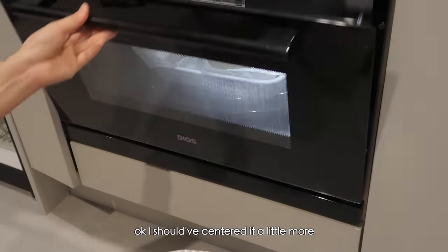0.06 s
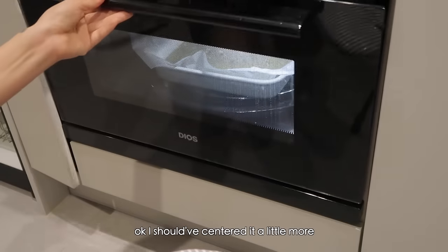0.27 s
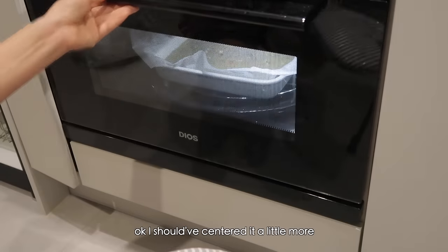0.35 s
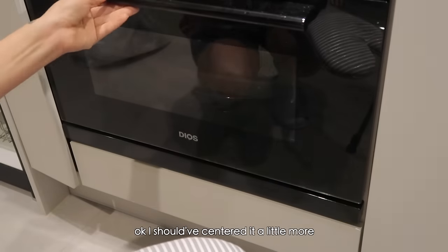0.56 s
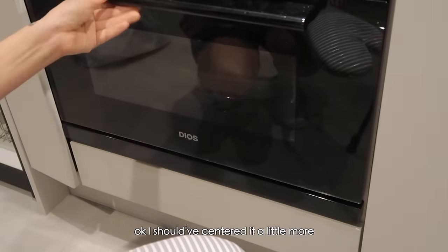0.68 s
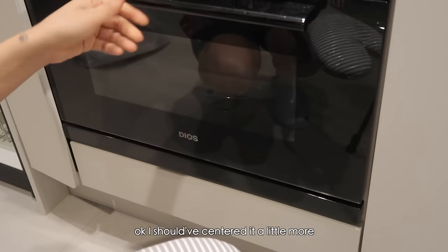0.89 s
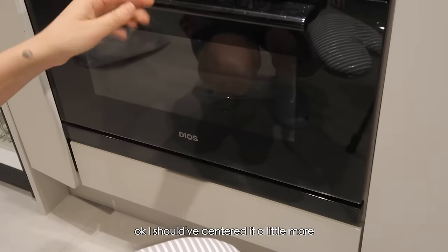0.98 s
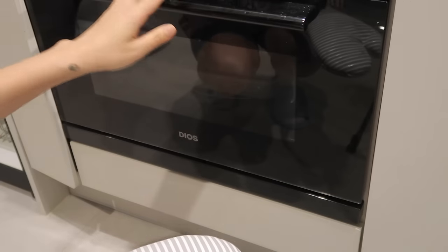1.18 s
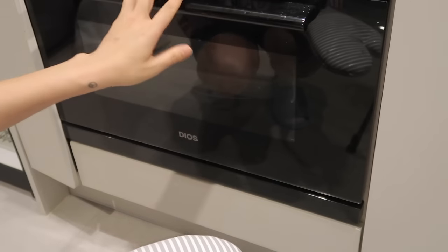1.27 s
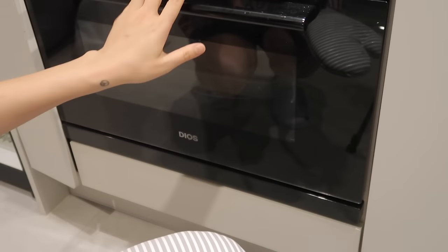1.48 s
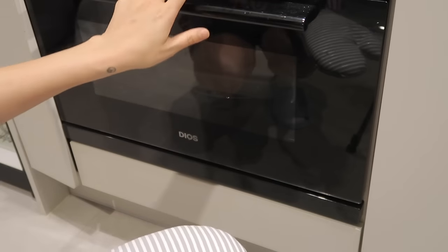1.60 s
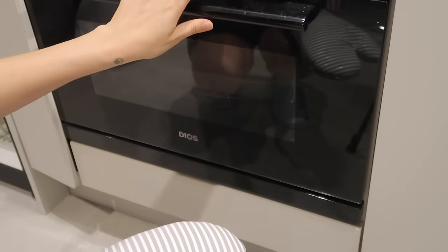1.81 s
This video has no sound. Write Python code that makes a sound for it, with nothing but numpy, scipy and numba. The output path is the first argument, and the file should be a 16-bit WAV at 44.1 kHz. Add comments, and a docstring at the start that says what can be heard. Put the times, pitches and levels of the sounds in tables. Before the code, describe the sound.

An oven door is pushed shut: a light hinge rattle, then one sharp, booming slam with a brief clatter of glass and metal. The oven fan hums throughout, duller afterwards. Heard close up in a kitchen.

```python
"""Kitchen, close to a phone: an oven door is pushed shut while the oven fan hums.
The hinge catches with a light rattling bump, then the door slams on its frame: a crack, a low boom of
the case, a short clatter of glass and sheet metal. The closing gap shuts off the fan's brighter air.
The slam overloads the recorder, whose gain ducks and creeps back."""
import sys
import numpy as np
from scipy import signal
from scipy.fft import rfft, irfft
from scipy.io import wavfile
from scipy.ndimage import uniform_filter1d
from numba import njit

SR = 44100
rng = np.random.default_rng(int(sys.argv[2]) if len(sys.argv) > 2 else 0)


def int16_out(signal):
    """Quantize to a 16-bit WAV file."""
    q = np.round(np.clip(np.atleast_2d(signal).T, -1, 1) * 32767)
    wavfile.write(sys.argv[1], SR, q.astype(np.int16))


N = 81585
SLAM_S = 0.3852


# door seating on its frame (time after first contact [s], level [dB])
SEATING_CONTACTS = [(0, -0.5), (.0031, 5.5), (.0053, 3.5), (.0090, -3.5), (.019, -2.5)]
# metal-on-metal snap (frequency [Hz], relative density [dB])
SNAP_SPECTRUM = [(60, -23.5), (300, 7.5), (1000, -0.5), (3000, -1.5), (4500, -8), (8000, -25.5),
                 (16000, -38.5)]
# slam clatter (frequency [Hz], relative density [dB])
CLATTER_SPECTRUM = [(40, -38), (90, -15.5), (150, -5.5), (310, 0.5), (460, -8.5), (750, -5.5), (1000, -12),
                    (2400, -3.5), (3300, -5), (4500, -11), (8000, -23.5), (11000, -35), (16000, -48)]
# panel decay (frequency [Hz], T60 [s])
PANEL_DECAY = [(100, 0.16), (500, 0.36), (2000, 0.17), (5000, 0.12), (9000, 0.22), (15000, 0.066)]

def slam(crack_hz=2620, crack_db=5.5, snap_t60_s=.016, clatter_db=0.5, boom_db=13, ring_db=-3.5):
    """Door hits frame: a crack, quick snapping contacts, case boom, clattering and ringing panels."""
    crack = undb(crack_db) * np.sin(2 * np.pi * crack_hz * clock()) * decay(t60_s=.01)
    contacts = sum(delay(undb(db) * white() * decay(snap_t60_s), s) for s, db in SEATING_CONTACTS)
    panel_noise = band_decay(white(), PANEL_DECAY) * rise(tau_s=.0018)
    clatter = undb(clatter_db) * stereo(panel_noise, CLATTER_SPECTRUM)
    snap = stereo(contacts, SNAP_SPECTRUM)
    impact = crack + snap + clatter + undb(boom_db) * case_boom() + undb(ring_db) * panel_ring()
    return delay(impact, SLAM_S)


# oven case and cabinet modes (frequency [Hz], level [dB], T60 [s])
CASE_MODES = [(66.23, -15, .36), (84.5, -19, .45), (115.7, -16.5, 0.08), (128.4, -1.5, 0.11),
              (158.6, -4, 0.062), (197.3, -21, 0.35), (232.8, -17.5, 0.15), (295, 3, 0.069),
              (354.4, -9, 0.13)]

def case_boom(push_s=.00055, lag_s=.00062):
    """The case is pushed inwards through the soft seal and swings in its low modes."""
    pole = np.exp(-1 / (push_s * SR))
    cushioned = signal.lfilter([(1 - pole) ** 2], [1, -2 * pole, pole ** 2], ring(CASE_MODES, np.cos))
    return -delay(cushioned, lag_s)


# door glass and sheet metal modes (frequency [Hz], level [dB], T60 [s])
DOOR_MODES = [(532.5, -10.5, 0.45), (565.6, -10.5, 0.25), (682, -3, 0.091), (785.4, 5, 0.091),
              (1137, -4.5, 0.11), (1608, -3, .14), (1945, 0.5, 0.087), (2024, -6.5, 0.26),
              (2530, -5.5, 0.11), (2903, -9, 0.12), (3267, -6.5, 0.077), (4000, -11, 0.12)]

def panel_ring(spread_s=.004):
    """The blow spreads over the door and wakes each mode after a random lag."""
    lags_s = rng.random(len(DOOR_MODES)) * spread_s
    return sum(delay(ring([mode]) * rise(tau_s=.0004), s) for mode, s in zip(DOOR_MODES, lags_s))


# hinge, seal and door knocks (time [s], rattle level [dB], boom level [dB])
LIGHT_KNOCKS = [(0.2171, -29, -50), (0.2228, -19, -31.5), (0.2299, -33.5, -32.5), (0.2379, -31, -22.5),
                (0.2476, -36, -23), (0.2700, -42, -20), (0.338, -30.5, -28), (0.368, -23.5, -32.5),
                (0.3827, -19, -32), (0.4150, -7.5, -15.5), (0.46, -17.5, -5)]
# knock rattle (frequency [Hz], relative density [dB])
RATTLE_SPECTRUM = [(60, -23.5), (200, -7.5), (330, 4.5), (550, 2.5), (1000, -1.5), (1800, 2), (3300, -4.5),
                   (5000, -12.5), (8000, -34.5), (11000, -42), (16000, -42.5)]

def knocks(ring_db=-14):
    """Light contacts rattle the panels and nudge the case."""
    boom = case_boom()
    ringing = undb(ring_db) * panel_ring()
    rattle = stereo(band_decay(white(), PANEL_DECAY), RATTLE_SPECTRUM) + ringing
    return sum(delay(undb(rattle_db) * rattle + undb(boom_db) * boom, s)
               for s, rattle_db, boom_db in LIGHT_KNOCKS)


# kitchen reverberation (frequency [Hz], T60 [s])
ROOM_DECAY = [(80, 0.82), (250, 0.63), (600, 0.7), (1200, 0.53), (3000, 0.37), (8000, 0.39), (15000, 0.099)]
# reflection colour (frequency [Hz], relative gain [dB])
ROOM_SPECTRUM = [(40, -13), (80, -5), (135, -6), (250, -1), (400, -0.5), (700, -1.5), (3000, 2),
                 (16000, -4)]

def kitchen_reverb(x, level_db=-14, predelay_s=.008):
    """Diffuse reflections from cupboards and floor."""
    tail = stereo(band_decay(white(), ROOM_DECAY) * rise(tau_s=.0097), ROOM_SPECTRUM)
    tail = delay(tail / np.sqrt(np.sum(tail ** 2) / 2), predelay_s)
    return undb(level_db) * signal.fftconvolve(x.mean(axis=0)[None], tail, axes=1)[:, :N]


# fan and motor lines, door shut (frequency [Hz], rms level [dB])
HUM_LINES = [(120.7, -37.5), (65.3, -49), (247, -56.5)]
# fan air (frequency [Hz], relative density [dB])
AIR_SPECTRUM = [(25, -12), (50, -4.5), (75, -4.5), (100, -3.5), (160, -6), (260, -7), (400, -8.5),
                (550, -7.5), (780, -13.5), (1050, -16.5), (1350, -13), (1750, -18.5), (2100, -18.5),
                (2600, -25), (3400, -30), (5000, -39.5), (8000, -47), (13000, -50), (16000, -69)]
# fan air stereo width (frequency [Hz], side minus mid [dB])
AIR_WIDTH = [(110, -60), (180, -25.5), (300, -12.5), (600, -17.5), (2100, -19.5), (2900, -10.5), (3900, 0),
             (5000, -1), (11000, 1.5)]
# air escaping through the open door (frequency [Hz], relative density [dB])
GAP_SPECTRUM = [(100, -12), (400, 7.5), (1100, 7.5), (2600, 4.5), (4000, -11.5), (8000, -27.5),
                (16000, -42)]

def fan(air_db=-39.5, gap_db=-39.5, closing_s=.12, open_boost_db=4, waver_db=.55, drift_rad=.08):
    """Motor hum and air noise; as the gap closes, the hum drops and the brighter air is shut off."""
    t = clock()
    hum = np.zeros(N)
    for hz, db in HUM_LINES:
        amplitude = np.sqrt(2) * undb(db + waver_db * wander(rate_hz=12))
        hum += amplitude * np.sin(2 * np.pi * hz * t + drift_rad * wander(rate_hz=2.2))
    opening = np.clip((SLAM_S - t) / closing_s, 0, 1)
    air = undb(air_db) * stereo(white(), AIR_SPECTRUM, AIR_WIDTH)
    gap_air = undb(gap_db) * opening * stereo(white(), GAP_SPECTRUM)
    return hum * undb(open_boost_db * opening) + air + gap_air


# stereo width of door, gap air and room (frequency [Hz], side minus mid [dB])
DEFAULT_WIDTH = [(100, -63.5), (200, -52), (350, -33), (750, -25.5), (1400, -27.5), (2400, -27.5),
                 (3400, -11), (4800, -7.5), (7000, 1.5), (11000, 6.5)]

def stereo(pair, spectrum, width=DEFAULT_WIDTH):
    """Two noises as mid and side, coloured at unit mid power gain; only the treble is wide."""
    mid, side = colour(pair, spectrum)
    rms_gain = np.sqrt(np.mean(undb(lookup(spectrum, np.linspace(0, SR / 2, N))) ** 2))
    return (mid + colour(side, width) * np.array([[1], [-1]])) / rms_gain


def colour(x, table):
    """Minimum-phase filter from (frequency [Hz], gain [dB])."""
    size = 2 * N
    cepstrum = irfft(np.log(undb(lookup(table, np.arange(N + 1) * SR / size))), size)
    cepstrum[1:N] *= 2
    cepstrum[N + 1:] = 0
    return irfft(rfft(x, size) * np.exp(rfft(cepstrum)), size)[..., :N]


def band_decay(x, t60_table):
    """Each half-octave band dies away at its own rate."""
    centres_hz = 45 * 2 ** (np.arange(18) / 2)
    band = np.interp(np.arange(N // 2 + 1) * SR / N, centres_hz, np.arange(len(centres_hz)))
    spectrum = rfft(x)
    return sum(irfft(spectrum * np.maximum(1 - abs(band - k), 0), N) * decay(lookup(t60_table, hz))
               for k, hz in enumerate(centres_hz))


def ring(modes, wave=np.sin):
    """Struck modes as damped sinusoids."""
    return sum(undb(db) * wave(2 * np.pi * hz * clock()) * decay(t60_s) for hz, db, t60_s in modes)


def decay(t60_s):
    """Envelope falling 60 dB in t60_s."""
    return np.exp(-np.log(1000) * clock() / t60_s)


def rise(tau_s):
    """First-order onset."""
    return 1 - np.exp(-clock() / tau_s)


def delay(x, s):
    """Shift later by s seconds."""
    k = max(int(s * SR), 0)
    return np.concatenate([np.zeros(x.shape[:-1] + (k,)), x[..., :N - k]], axis=-1)


def wander(rate_hz):
    """Smooth random drift, unit deviation."""
    k = int(SR / rate_hz)
    steps = np.repeat(rng.standard_normal(N // k + 1), k)
    smooth = uniform_filter1d(uniform_filter1d(steps, k), k)[:N]
    return smooth / smooth.std()


def white():
    """Two independent white noises."""
    return rng.standard_normal((2, N))


def lookup(table, hz):
    """Interpolate on a log-frequency axis."""
    knots_hz, values = np.array(table, float).T
    return np.interp(np.log(np.maximum(hz, 1)), np.log(knots_hz), values)


def undb(db):
    """Decibels to gain."""
    return 10 ** (np.asarray(db) / 20)


def clock():
    """Sample times [s]."""
    return np.arange(N) / SR


def scene():
    """Door, its reflections and the fan."""
    door = knocks() + slam()
    return door + kitchen_reverb(door) + fan()


@njit
def gain_reduction(over_db, attack_s, release_db_per_s):
    """Cut [dB]: rises quickly towards any excess, then falls at a steady rate."""
    cuts_db, cut_db = np.empty(len(over_db)), 0.
    for i in range(len(over_db)):
        if over_db[i] > cut_db:
            cut_db += (over_db[i] - cut_db) / (attack_s * SR)
        else:
            cut_db = max(cut_db - release_db_per_s / SR, 0.)
        cuts_db[i] = cut_db
    return cuts_db


# recorder treble roll-off (frequency [Hz], gain [dB])
RECORDER_TONE = [(3000, -1), (4500, 0.5), (10000, -3), (16000, -5.5)]

def record(dry, low_cut_hz=61, threshold_db=-5.5, clip_knee=5, top_hz=15900):
    """Low cut; automatic gain, too slow for the first swings, which clip softly; treble cut."""
    low_cut = signal.cheby1(2, 2, low_cut_hz, "high", fs=SR, output="sos")
    top_cut = signal.ellip(8, .2, 70, top_hz, fs=SR, output="sos")
    x = undb(1.5) * signal.sosfilt(low_cut, dry)
    over_db = 20 * np.log10(abs(x).max(axis=0) + 1e-9) - threshold_db
    ducked = x * undb(-gain_reduction(over_db, attack_s=.005, release_db_per_s=9.5))
    clipped = ducked / (1 + abs(ducked) ** clip_knee) ** (1 / clip_knee)
    return signal.sosfilt(top_cut, colour(clipped, RECORDER_TONE))


dry = scene()
out = record(dry)
int16_out(out)
```